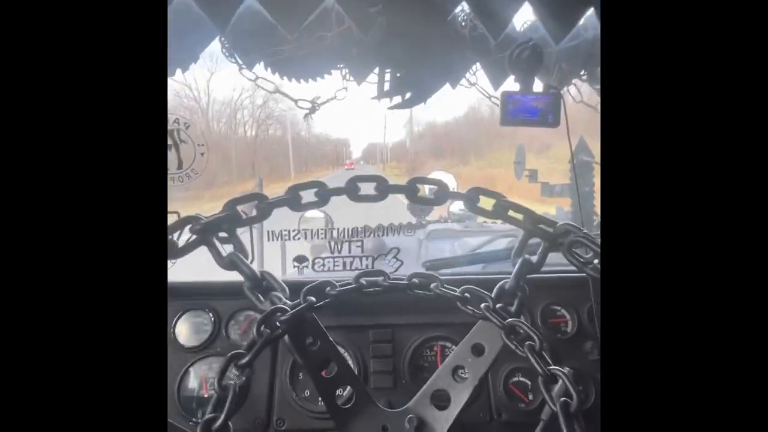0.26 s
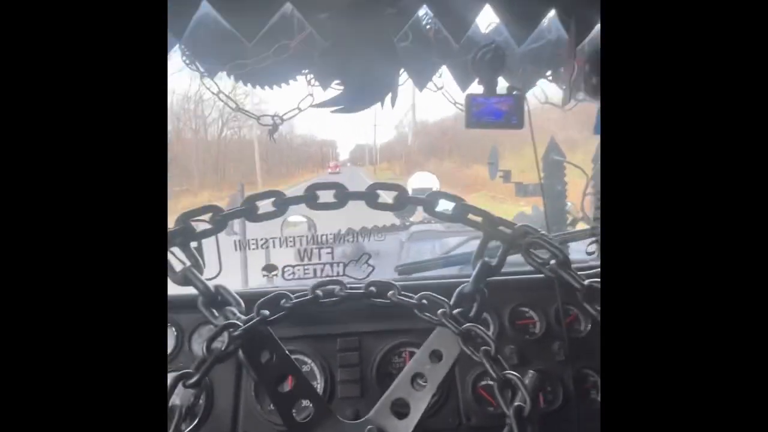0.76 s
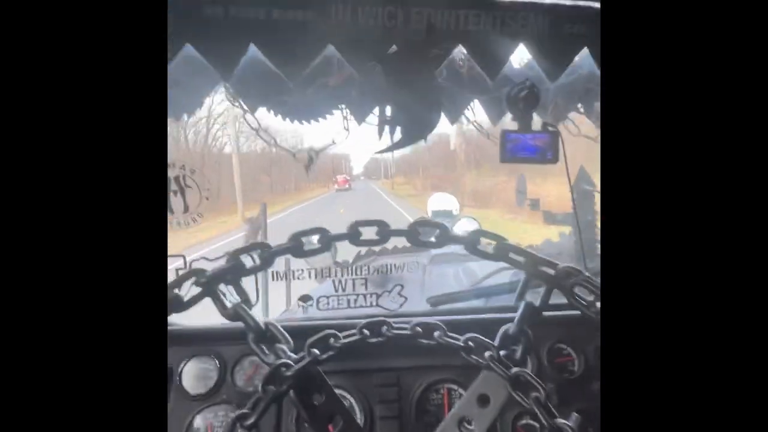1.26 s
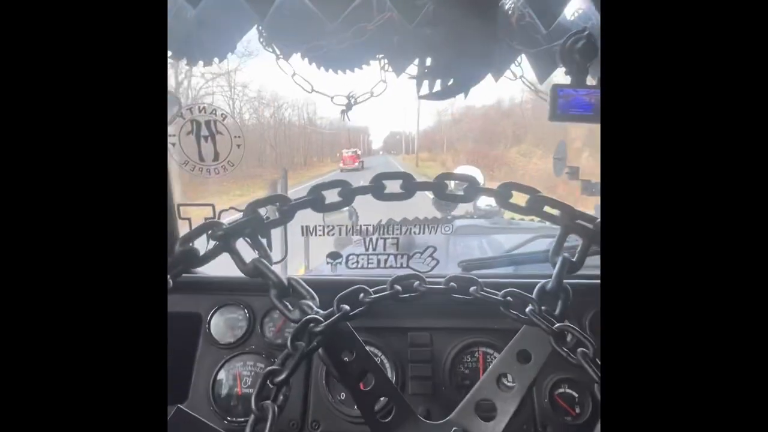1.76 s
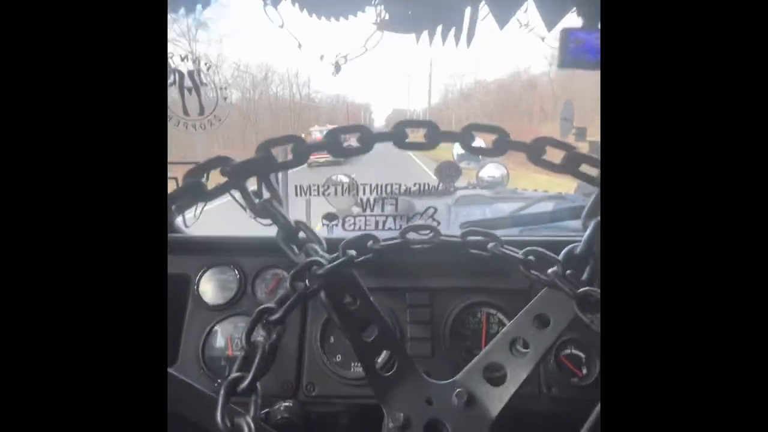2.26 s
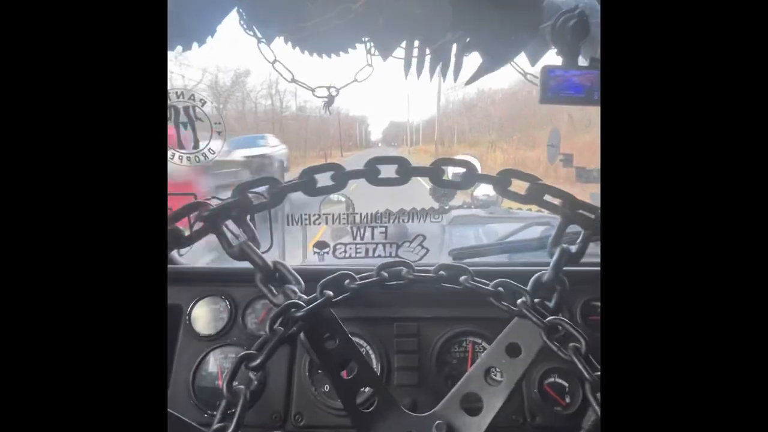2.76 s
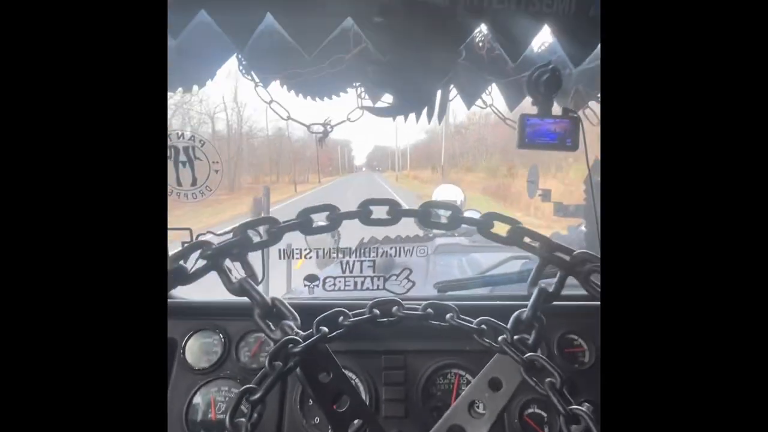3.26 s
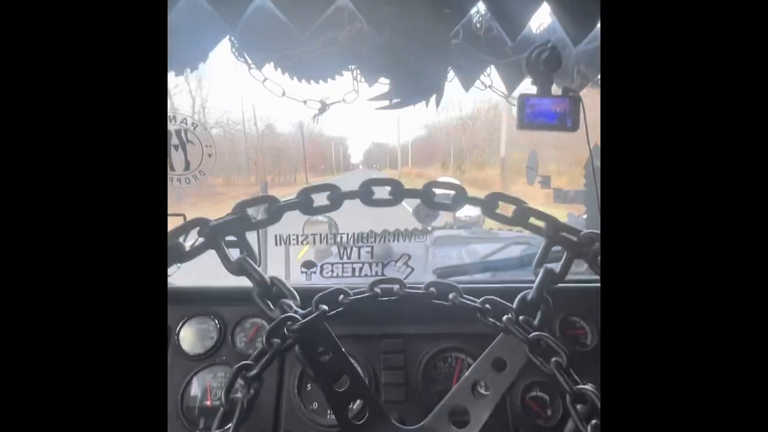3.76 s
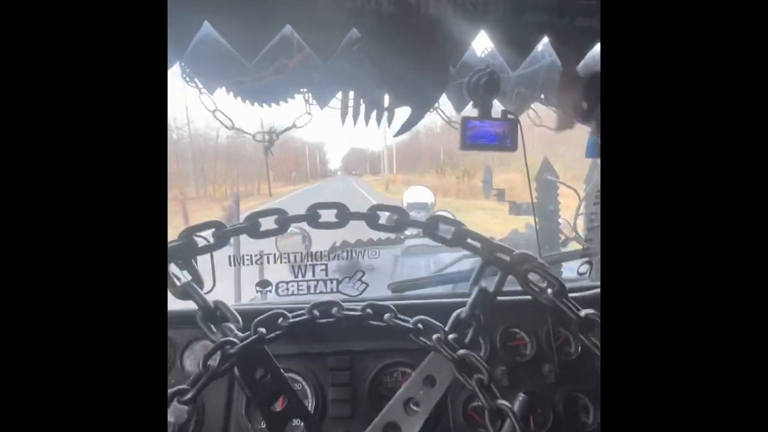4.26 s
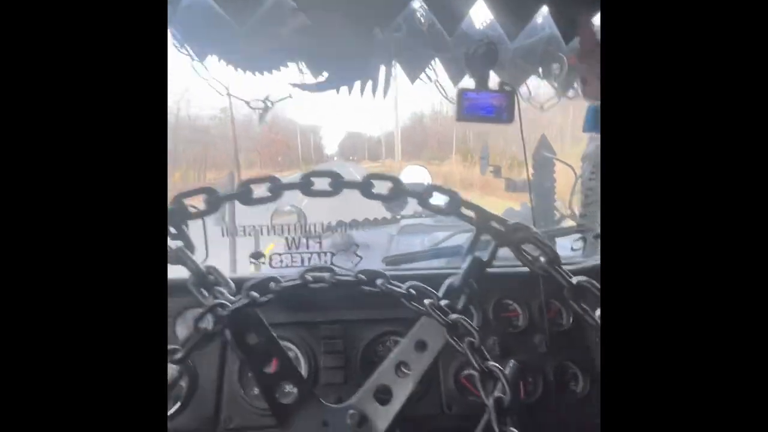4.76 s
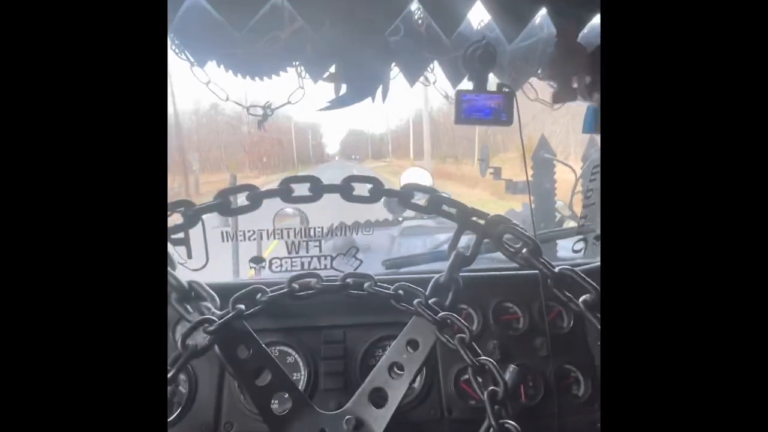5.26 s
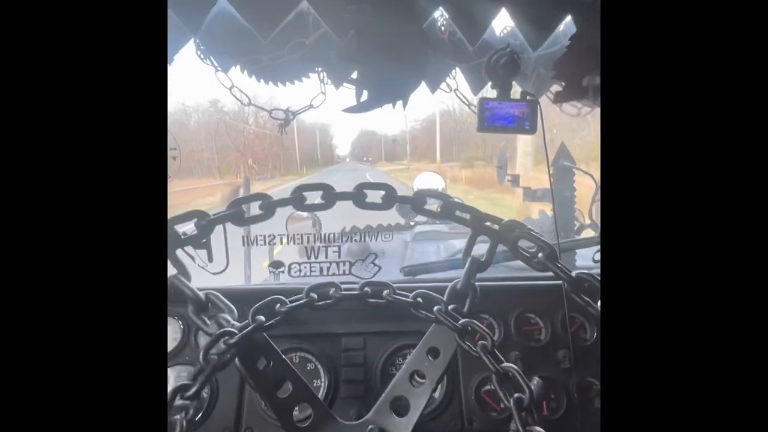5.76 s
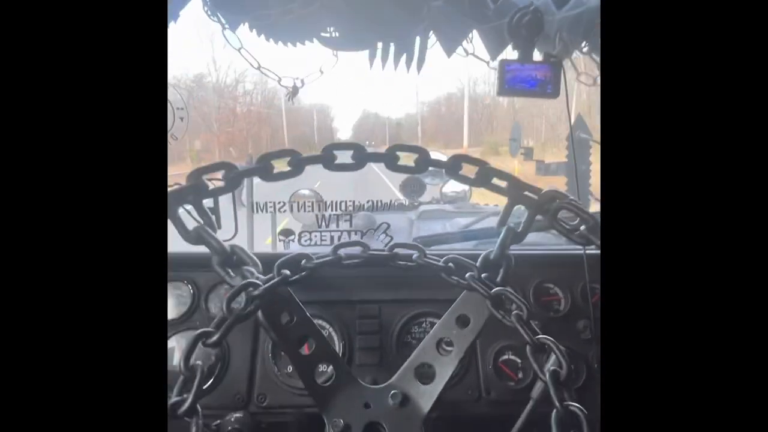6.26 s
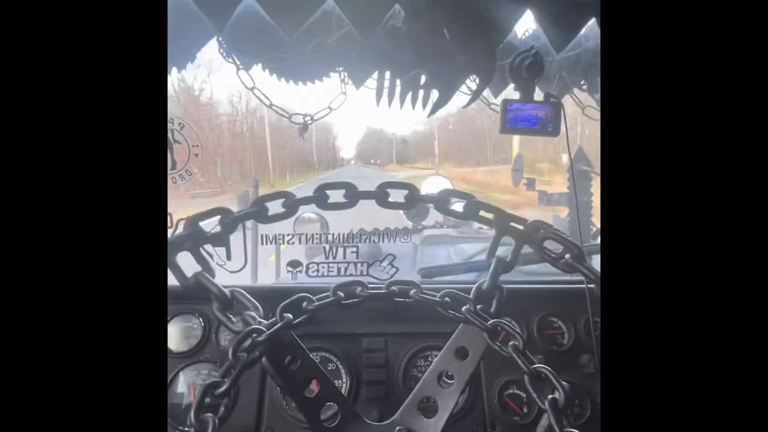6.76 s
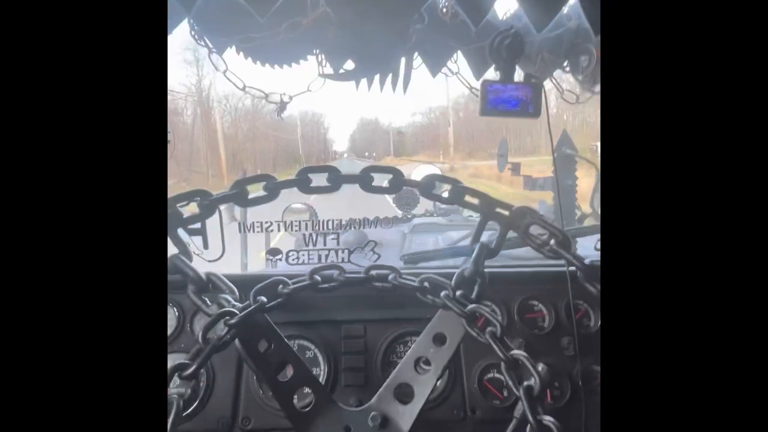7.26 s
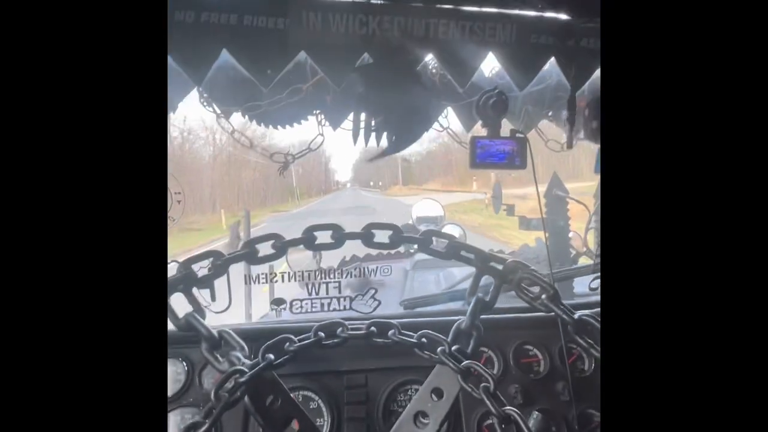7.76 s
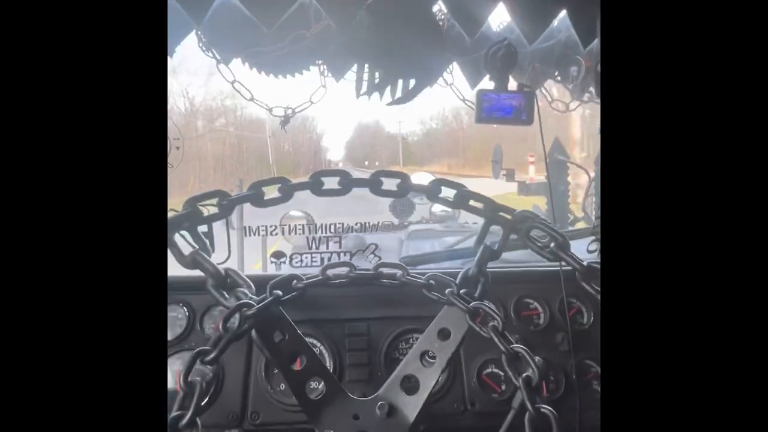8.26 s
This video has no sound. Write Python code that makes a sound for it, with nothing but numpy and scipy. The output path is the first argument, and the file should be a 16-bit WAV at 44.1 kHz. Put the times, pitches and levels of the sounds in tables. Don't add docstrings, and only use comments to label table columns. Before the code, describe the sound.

Deep diesel drone and road roar in a truck cab, with shrill turbo whistle, squeaking trim, chain ticks and metallic air-valve clanks.

```python
import sys
import numpy as np
from scipy import signal
from scipy.fft import rfft, irfft, next_fast_len
from scipy.io import wavfile
from scipy.ndimage import uniform_filter1d

SR = 44100
rng = np.random.default_rng(int(sys.argv[2]) if len(sys.argv) > 2 else 0)


def dump(signal):
    limited = np.clip(np.atleast_2d(signal).T, -1, 1)
    pcm = np.round(limited * 32767).astype(np.int16)
    wavfile.write(sys.argv[1], SR, pcm)


def level_to_linear(level):
    exponent = np.asarray(level, float) / 20
    return 10 ** exponent


N = 375732


def evened(x):
    return x / np.sqrt(np.mean(x ** 2) + 1e-20)


def read(points, hz, column=1):
    rows = np.transpose(points)
    return np.interp(np.log(hz + 1), np.log(rows[0] + 1), rows[column])


def curves(rows, t):
    s, *columns = np.transpose(rows)
    return [np.interp(t, s, c) for c in columns]


def add(mix, s, sound):
    part = mix[round(s * SR):][:len(sound)]
    part += sound[:len(part)]


def noise(length):
    return rng.standard_normal(length)


def wander(t, rate_hz, count=1):
    knots = rng.standard_normal((count, int(N / SR * 100) + 2))
    knots = uniform_filter1d(knots, size=3)
    knots = signal.lfilter([1], [1, -np.exp(-2 * np.pi * rate_hz / 100)], knots)
    return np.array([np.interp(t * 100, np.arange(len(k)), evened(k)) for k in knots])


def swells(rows, t):
    return sum(level_to_linear(db) * np.exp(-((t - s) / half) ** 2) for s, db, half in rows)


def coloured(x, points):
    return irfft(rfft(x) * level_to_linear(read(points, np.fft.rfftfreq(len(x), 1 / SR))), len(x))


def resonate(x, hz, width_hz):
    turn = np.exp(2j * np.pi * np.cumsum(hz * np.ones(len(x))) / SR)
    r = np.exp(-np.pi * width_hz / SR)
    low = x / turn
    for _ in range(2):
        low = signal.lfilter([1 - r], [1, -r], low)
    return 2 * (turn * low).real


# (time [s], firing rate [Hz])
FIRING = [(0, 78.2), (.58, 78.4), (.7, 75.4), (1.0, 66.4), (1.15, 64.8), (1.27, 64.9), (1.5, 66.8),
          (1.9, 67.3), (2.6, 69.6), (3.8, 74.0), (4.65, 76.5), (4.95, 68.1), (5.1, 65.1), (5.4, 63.0),
          (5.66, 64.4), (6.35, 65.1), (8.0, 69.4), (8.52, 70.1)]
# (time [s], fuel [dB], share sent down the exhaust stack [dB], load on the body [dB])
EFFORT = [(0, -14, -8.5, -0.5), (.5, -15.5, -5, -0.5), (.72, -20.5, -6.5, -4.5), (1.05, -19.5, -5, -3),
          (1.27, -17, 1, -5), (1.7, -10.5, -5, -2), (2.1, -13, 2.5, 0), (2.6, -15.5, 7, 1),
          (3.0, -11, -1, 1), (4.0, -15.5, 8.5, 0.5), (4.65, -14, 3, -1.5), (5.1, -19, -3, -5.5),
          (5.55, -19, -3, -5), (5.8, -10.5, -10.5, -2.5), (6.6, -13, -13, 1), (7.15, -11.5, -1.5, 1),
          (8.0, -12, -1, 0.5), (8.52, -10.5, -4, -2)]
# (frequency [Hz], level over fuel [dB])
DOOR = [(190, -34.5), (203, -24), (213, -28.5), (223, -4), (230, -16.5), (240, -23)]
UNEVEN = [-15.5, -23, -15.5, -18.5, -16, -21]
# (frequency [Hz], level [dB])
CAB = [(10, -32), (40, -17.5), (70, 0.5), (110, -1), (140, 2), (162, 5), (185, -8.5), (230, -4), (280, -13),
       (330, -6), (375, -5), (420, -14.5), (500, -6.5), (800, -16.5)]


def engine(t):
    hz, (fuel_db, stack_db, load_db) = curves(FIRING, t)[0], curves(EFFORT, t)
    turns = np.cumsum(hz) * t[1]
    shake, flutter = wander(t, 2.3, count=6), wander(t, 1.33, count=132)
    out = np.zeros(len(t))
    orders_db = fuel_db, fuel_db + stack_db, fuel_db + read(DOOR, 3 * hz)
    for k, db in enumerate(orders_db):
        level = np.sqrt(2) * level_to_linear(db + 0.35 + 0.45 * shake[k])
        out += level * np.cos(2 * np.pi * (k + 1) * turns + 0.068 * shake[k + 3] - 0.81 * k)
    for k in range(2, 66):
        if k not in (6, 12, 18):
            db = UNEVEN[k % 6] + read(CAB, hz * k / 6) + 1.52 * load_db - 8.5 + 2.4 * flutter[k]
            out += level_to_linear(db) * np.cos(2 * np.pi * k / 6 * turns + 0.3 * flutter[66 + k] + k * k)
    return out


# (time [s], peak level [dB], half-width [s], pitch [Hz])
DRUMS = [(0.37, -21, 0.3, 156), (.2, -27, 0.26, 169), (0.49, -21, 0.53, 115.8), (0.18, -27, 0.27, 220.4),
         (1.06, -17, .08, 154.2), (2.2, -17, 0.34, 161.2), (4.4, -28, 0.55, 321.7), (4.0, -31.5, 0.56, 375),
         (4.4, -22.5, 0.46, 130), (6.3, -21.5, .15, 132), (5.3, -17, 0.12, 119), (6.4, -18, .25, 162),
         (6.95, -17.5, 0.34, 160), (7.6, -32.5, 0.71, 328.6), (8.0, -25, 0.37, 161), (7.6, -24.5, 0.6, 92),
         (7.6, -29.5, .9, 46), (7.6, -31, 0.97, 227), (7.77, -31.5, 0.41, 540), (7.4, -29, .4, 396),
         (6.6, -33, .2, 600), (0.29, -30, 0.16, 540), (2.3, -33, 0.14, 480), (2.7, -28, 0.23, 560),
         (4, -34, 0.41, 500), (3.8, -34.5, 0.37, 565), (3.0, -33.5, 0.37, 715), (3.7, -37, 0.26, 450)]


def drums(t):
    hz, out = curves(FIRING, t)[0], np.zeros(len(t))
    turns, shake = np.cumsum(hz) * t[1], wander(t, 3.7, count=2 * len(DRUMS))
    for k, (s, db, half, panel_hz) in enumerate(DRUMS):
        order = np.round(6 * panel_hz / np.interp(s, t, hz)) / 6
        level = np.sqrt(2) * swells([(s, db, half)], t) * level_to_linear(1.5 * shake[k])
        out += level * np.cos(2 * np.pi * order * turns + 0.6 * shake[-k - 1])
    return out


# (frequency [Hz], level [dB per Hz])
RUMBLE = [(12, -56), (28, -31), (50, 3), (100, -9), (160, -9), (200, -14.5), (370, -26), (450, -19),
          (700, -24), (1000, -70)]
# (frequency [Hz], level [dB per Hz])
ROAR = [(150, -46), (300, -22), (500, -3.5), (800, -4.5), (1100, -10), (1600, -18.5), (2500, -35),
        (4000, -55)]
# (frequency [Hz], level [dB per Hz])
HISS = [(700, -33.5), (1500, 1), (2200, -2), (3300, -0.5), (4700, -7.5), (6000, -8.5), (7300, -12),
        (8800, -17), (11000, -25), (13000, -31), (15500, -35.5), (16100, -34), (16500, -74)]


def road():
    frames, hz = N // 256 + 5, np.fft.rfftfreq(1024, 1 / SR)
    patches = uniform_filter1d(rng.standard_normal((frames, 513)), 7, 0)
    patches = evened(uniform_filter1d(patches, 14, 1)).T
    flicker = evened(uniform_filter1d(noise(frames), 4))
    load_db = curves(EFFORT, (np.arange(frames) - 2) * 256 / SR)[2]
    # spectrum, full-load level [dB], share of load followed, lift, patches, flicker [dB]
    layers = [(RUMBLE, -29, 0.25, 9, 1.1, 0.4),
              (ROAR, -28.5, 0.71, 2.5, 0.8, 0.4),
              (HISS, -36.5, 1, 4, 1.5, 1.3)]
    power = 0
    for shape, full_db, follow, lift_db, patchy_db, flicker_db in layers:
        colour = evened(level_to_linear(read(shape, hz)))[:, None]
        db = full_db + follow * load_db + lift_db + patchy_db * patches + flicker_db * flicker
        power = power + (colour * level_to_linear(db)) ** 2
    re, im = rng.standard_normal((frames, 513, 2, 2)).T
    spectra = (re + 1j * im) * np.sqrt(power) / 19
    return signal.istft(spectra, nperseg=1024, noverlap=768)[1][:, :N]


# (time [s], whistle [Hz], level [dB])
TURBO = [(0, 7950, -45), (.49, 7900, -46), (.62, 7800, -54), (.8, 6850, -51), (1.05, 5750, -52),
         (1.5, 5000, -50), (1.75, 5330, -51), (2.2, 6500, -48), (2.55, 7550, -48), (2.9, 8110, -45),
         (4.72, 8150, -47), (4.93, 6900, -51), (5.5, 5050, -60), (6.2, 5500, -55), (6.6, 6700, -46),
         (7.3, 7900, -46), (8.1, 8000, -44), (8.52, 7720, -46)]


def turbo(t):
    hz, db = curves(TURBO, t)
    spool_s = 0.14
    hz = uniform_filter1d(hz, size=round(spool_s * SR), mode='nearest')
    throb = 1 + 0.14 * np.cos(2 * np.pi * np.cumsum(curves(FIRING, t)[0]) / SR)
    fuzz = np.array([evened(resonate(noise(N), hz, 300)) for _ in range(2)])
    core = evened(resonate(noise(N), hz, 60))
    hurry = np.minimum(abs(np.gradient(hz)) * SR / 2500, 1)
    level = level_to_linear(db + 1 + (1.7 + 0.93 * hurry) * wander(t, 13))
    return level * throb * (fuzz + level_to_linear(1) * core)


# (time [s], peak level [dB])
SQUEAKS = [(.0513, -37), (0.1154, -32), (.9994, -39), (1.179, -30), (1.2351, -32), (1.2947, -29),
           (1.3578, -36), (1.4102, -37), (1.12, -38), (1.914, -29), (2.6993, -38), (2.9731, -35),
           (3.174, -36), (4.4306, -36), (5.7, -38.5), (5.9015, -43), (6.764, -36), (6.8189, -33),
           (7.1656, -39), (7.8201, -35), (7.93, -32), (8.47, -39), (5.3667, -41), (5.8286, -36),
           (5.77, -37), (5.96, -38), (6.2429, -47), (6.4818, -32), (6.896, -31), (7.068, -29.5),
           (7.227, -35), (7.718, -32), (7.7677, -36), (7.882, -31), (7.9598, -39), (7.9989, -38),
           (8.125, -32), (8.1585, -27.5), (8.1908, -37), (8.327, -27.5), (8.3806, -35), (8.26, -36),
           (8.04, -36.5), (8.4413, -30.5), (8.502, -31)]
# (time [s], peak level [dB], pitch [Hz])
CHIRPS = [
    (4.597, -28, 3050),
    (5.228, -25.5, 2920),
    (5.25, -31, 2400),
    (6.9, -33, 2760),
    (8.095, -34, 2730),
    (8.445, -30, 2730),
    (8.475, -32, 2620),
    (4.135, -30, 2940),
]


def squeaks():
    out, u = np.zeros((2, N)), np.arange(int(0.05 * SR)) / SR
    swell = np.sin(np.pi * np.sqrt(u / u[-1])) ** 2
    slips = [(s, db, 5806 + 60 * rng.standard_normal()) for s, db in SQUEAKS]
    for s, db, hz in slips + CHIRPS:
        slip = 0.15 * evened(resonate(noise(len(u)), hz * (1 - 0.38 * u), 110)) * swell
        for path in out:
            add(path, s, level_to_linear(db + 9.5) * slip)
            add(path, s + 0.031, level_to_linear(db + 9 - 9) * slip[::-1])
    return out


# (time [s], level [dB], rebound after [s], 0 for none)
TICKS = [(.482, -32.5, 0.017), (.503, -29, 0.0093), (0.736, -40, 0), (0.956, -33, 0.005),
         (0.972, -31, .012), (1.564, -33.5, 0.00053), (1.639, -34.5, 0.00095), (1.7, -38.5, 0.00056),
         (1.784, -37.5, 0.003), (1.883, -34.5, 0.00086), (2.613, -28, .028), (2.862, -35, 0),
         (3.094, -32, 0.0027), (3.115, -31, 0.0037), (3.511, -33.5, .03), (4.114, -32.5, .019),
         (4.431, -36.5, 0.0026), (4.499, -28, 0.0047), (4.696, -35, 0.034), (4.746, -36.5, 0.0015),
         (4.857, -25.5, 0.00035), (4.979, -37, 0.008), (5.021, -37, 0.002), (5.222, -35, 0),
         (5.245, -33, 0.017), (5.57, -30.5, 0.013), (5.928, -46, 0), (6.139, -26.5, 0.0011),
         (6.401, -42, 0), (6.483, -37, 0), (6.897, -40, 0.0012), (.133, -37.5, 0), (6.719, -38, 0.013),
         (7.074, -35, .012), (7.257, -29, 0)]
# (frequency [Hz], level [dB per Hz])
LINK = [(2000, -18), (4000, -7.5), (6000, -0.5), (8000, 3.5), (10000, 0.5), (13000, -5.5), (15500, -1),
        (16300, -33)]


def ticks():
    out, u = np.zeros((2, N)), np.arange(2048) / SR
    fade = level_to_linear(2 - 60 * u / 0.005) + level_to_linear(-18 - 60 * u / 0.06)
    touches = [(s, db) for s, db, gap in TICKS]
    rebounds = [(s + gap, db - 5) for s, db, gap in TICKS if gap]
    for path in out:
        for s, db in touches + rebounds:
            add(path, s, level_to_linear(db + 6) * evened(coloured(noise(len(u)), LINK)) * fade)
    return out


# (time [s], peak level [dB], ring [Hz], time to fade 60 dB [s])
KNOCKS = [(0.134, -20.5, 2980, 0.093), (0.9526, -27.5, 4050, 0.43), (1.293, -23, 3350, 0.076),
          (1.8834, -20, 2610, 0.076), (1.948, -19.5, 2190, 0.1), (2.614, -20, 3650, 0.12),
          (2.858, -21.5, 2940, 0.18), (3.115, -20, 2850, 0.16), (4.0485, -15.5, 2130, 0.069),
          (4.115, -20.5, 2730, 0.18), (4.4278, -18.5, 2650, 0.078), (4.5, -13, 4400, 0.11),
          (4.596, -19.5, 2900, 0.083), (4.732, -12, 3770, 0.06), (4.9608, -22.5, 2000, 0.093),
          (5.022, -22.5, 2130, 0.1), (5.225, -12, 2860, 0.067), (5.25, -19, 2800, 0.12),
          (5.576, -21.5, 3280, 0.063), (5.754, -21, 2450, 0.17), (6.1357, -19.5, 3940, 0.13),
          (6.3788, -24, 2260, 0.13), (7.071, -21.5, 2600, 0.16), (7.5992, -20.5, 2620, 0.13),
          (8.465, -20.5, 2680, 0.13)]
# (frequency [Hz], level [dB per Hz])
PANEL = [(700, -26.5), (1500, -5), (2500, -1), (4500, -6), (6500, -6), (8500, -12), (16000, -28)]


def knocks():
    out, u = np.zeros((2, N)), np.arange(4096) / SR
    bounce = 1 + 0.18 * (u > 0.011)
    rise = np.minimum(u / 0.0034, 1)
    for path in out:
        for s, db, hz, t60 in KNOCKS:
            air = noise(len(u))
            ring = evened(resonate(air, hz, 500)) + level_to_linear(5) * evened(coloured(air, PANEL))
            add(path, s, level_to_linear(db - 12.5 - 60 * u / t60) * bounce * ring * rise)
    return out


# (frequency [Hz], level [dB per Hz])
NOZZLE = [(530, -30), (900, -3), (2110, -12.5), (2470, -6.5), (4070, -18.5), (5940, -0.5), (8760, -16.5),
          (9540, -33.5), (14600, -32), (15900, -14), (16500, -48)]


def puff():
    out, u = np.zeros((2, N)), np.arange(SR // 5) / SR
    hold_s, fade_db_per_s = 0.0083, 211.5
    level = level_to_linear(-14 - fade_db_per_s * np.maximum(u - hold_s, 0)) * signal.windows.tukey(len(u), 0.1)
    for path in out:
        add(path, 0.495, level * evened(coloured(noise(len(u)), NOZZLE)))
    return out


# (time [s], peak level [dB], half-width [s])
HUMS = [(.72, -22.5, 0.15), (1.08, -19, 0.09), (2.02, -25, 0.29), (2.28, -25, .12), (2.85, -24, 0.25),
        (3.9, -27, 0.28), (4.87, -21.5, 0.094), (5.07, -28, 0.067), (6.22, -22.5, 0.043),
        (6.62, -21.5, 0.28), (7.1, -33.5, 0.45), (8.0, -27.5, 0.29), (8.45, -22, 0.17)]


def intake(t):
    lag_s, base_hz, per_turbo_hz, top_hz = 0.0497, 266.9, 0.0148, 385.2
    hz = np.minimum(base_hz + per_turbo_hz * curves(TURBO, t - lag_s)[0], top_hz)
    shake = wander(t, 8.5, count=2)
    level = np.sqrt(2) * swells(HUMS, t) * level_to_linear(0.64 * shake[0])
    return level * np.cos(2 * np.pi * np.cumsum(hz) * t[1] + 0.2 * shake[1])


# (frequency [Hz], level [dB], time to fade 60 dB [s])
CLANKS = [
    [(1782, -13, .2), (5020, -9, .3), (5281, -8, .2), (5432, -5, .3), (5819, -2, .17), (6121, -3, .12),
     (6481, -7, .12), (6794, -5, .17), (7246, -8, .32), (7601, 0, .16), (8350, -9, .2), (8737, -10, .1)],
    [(2600, -11, 0.18), (3300, -6, 0.34), (3467, 0, 0.14), (3881, -16, 0.19), (4565, -16, 0.84),
     (5017, -1, 0.12), (5141, -20, 0.27), (5432, -10, 0.23), (6024, -2, 0.24), (6401, -1, 0.15),
     (6874, 0, 0.1), (7612, -7, 0.13), (7687, -3, 0.086), (8344, -24, 0.24)],
]
# (frequency [Hz], level [dB per Hz])
HOUSING = [(1000, -17), (2500, -2.5), (4300, -11), (5200, -1.5), (7600, 5.5), (8800, -20.5), (10000, -29),
           (15000, -28.5), (16500, -47)]


def clanks():
    out, u = np.zeros((2, N)), np.arange(16000) / SR
    rise = np.minimum(u / 0.002, 1)
    for path in out:
        for s, db, modes in zip((1.5668, 4.8578), (-10.5, -8.5), CLANKS):
            ring = np.zeros(len(u))
            for hz, mode_db, t60 in modes:
                fade = level_to_linear(mode_db - 60 * u / np.clip(t60, 0.1, 0.2))
                ring += fade * np.sin(2 * np.pi * (hz * u + rng.random()))
            ring *= 1 + 0.45 * evened(uniform_filter1d(noise(len(u)), size=150))
            spray = evened(coloured(noise(len(u)), HOUSING)) * level_to_linear(3.5 - 60 * u / 0.11)
            crack = evened(coloured(noise(len(u)), HOUSING)) * level_to_linear(4.5 - 60 * u / 0.0086)
            add(path, s, level_to_linear(db - 9.5) * ((ring + spray) * rise + crack))
    return out


# (frequency [Hz], side over mid [dB], likeness [0-1], left over right [dB])
PORTS = [(60, -30.5, .5, 0), (200, -15, 0, -1.53), (376, -9, 0.5, -3), (654, -3, .3, -1.4),
         (1280, -5, .5, 3), (2400, -2.5, .3, 1), (4400, -1.5, .5, 1), (6400, -1, 1, 0.5),
         (9100, 9, 0.5, -3), (10400, 19.5, .5, -5), (13900, 18, .5, -1), (15600, 3.5, .8, 5)]


def ports(near, other, top_db=20):
    size = next_fast_len(N)
    hz = np.fft.rfftfreq(size, 1 / SR)
    ratio = level_to_linear(np.minimum(read(PORTS, hz), top_db))
    like = np.clip(read(PORTS, hz, column=2), 0, 1)
    mid, far = rfft([near, other], size) / np.sqrt(1 + ratio ** 2)
    side = ratio * (-1j * like * mid + np.sqrt(1 - like ** 2) * far)
    lean = level_to_linear(read(PORTS, hz, column=3) / 2)
    return irfft([(mid + side) * lean, (mid - side) / lean], size)[:, :N]


def scene():
    t = np.arange(N) / SR
    slow = t[::16]
    bass = signal.resample_poly(engine(slow) + drums(slow) + intake(slow), 16, 1)[:N]
    paths = bass + road() + turbo(t) + squeaks() + knocks() + puff() + clanks()
    return ports(*paths) + ports(*ticks(), top_db=8)


def top_cut(x):
    return signal.sosfilt(signal.butter(12, 16050, fs=SR, output="sos"), x)


def record(dry):
    mix = 1.04 * np.tanh(dry / 1.04)
    return top_cut(mix)


dry = scene()
out = record(dry)
dump(out)
```